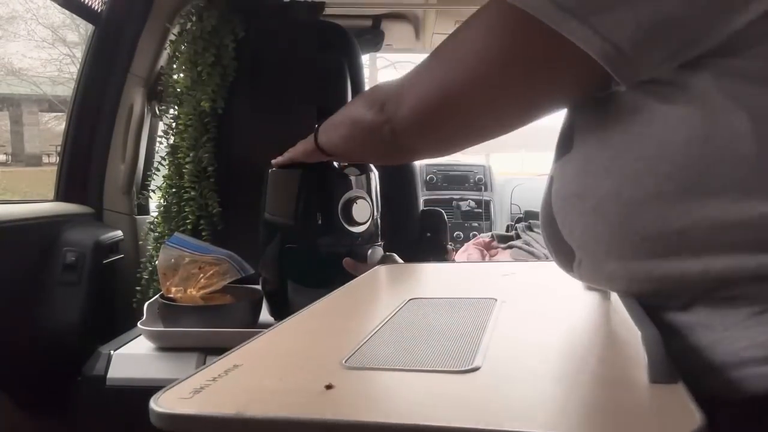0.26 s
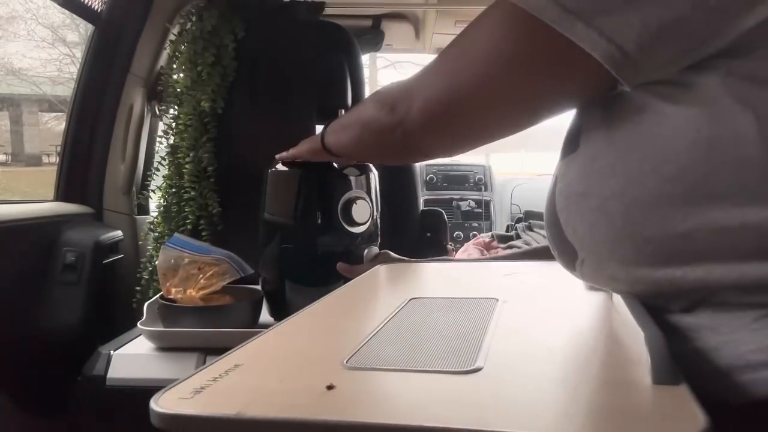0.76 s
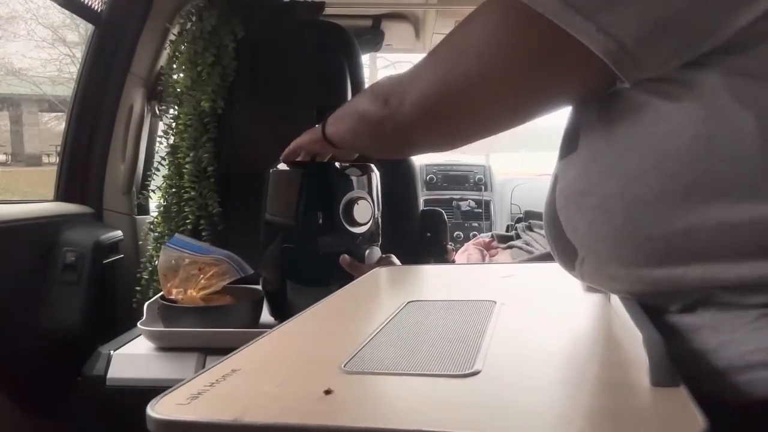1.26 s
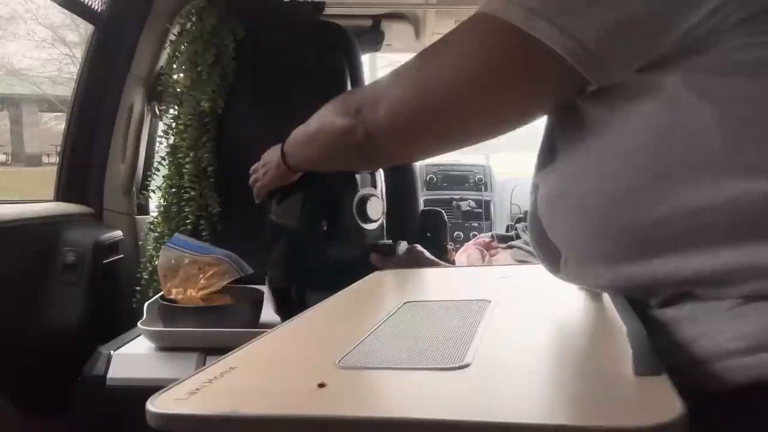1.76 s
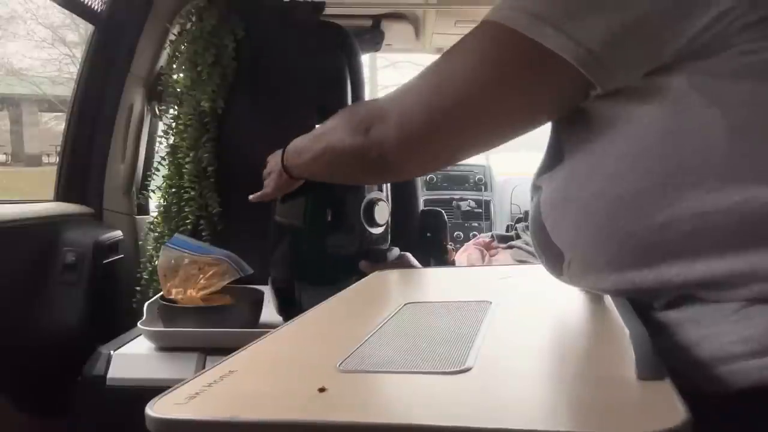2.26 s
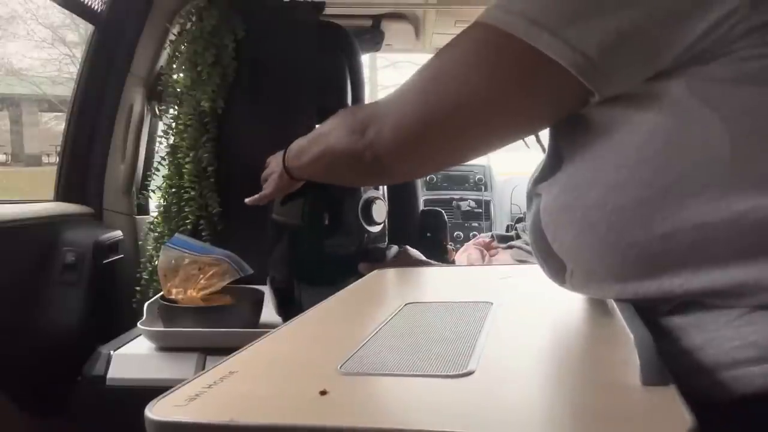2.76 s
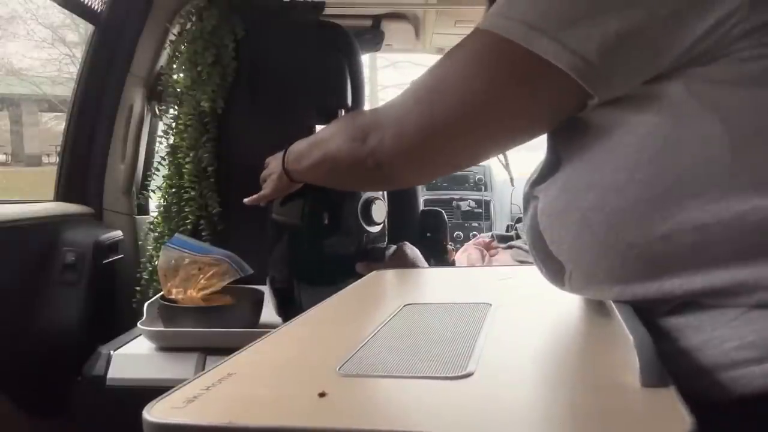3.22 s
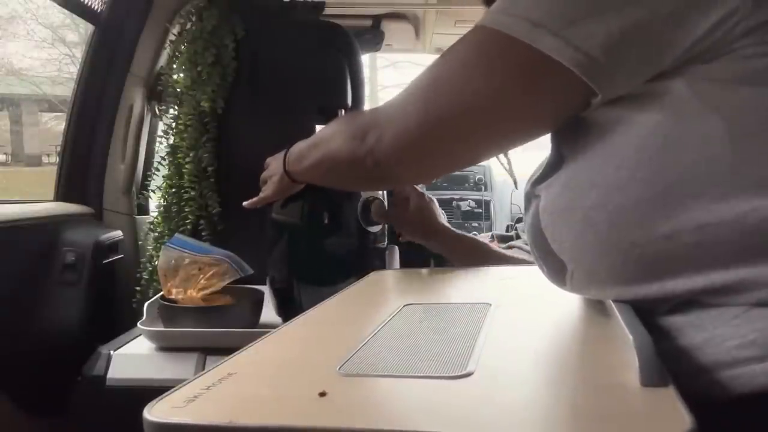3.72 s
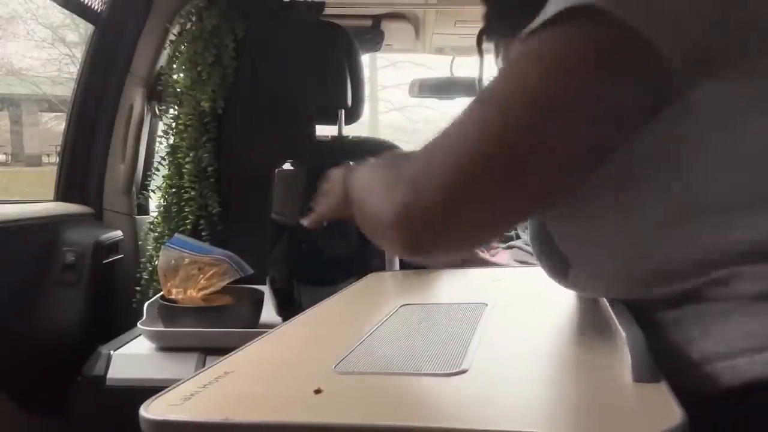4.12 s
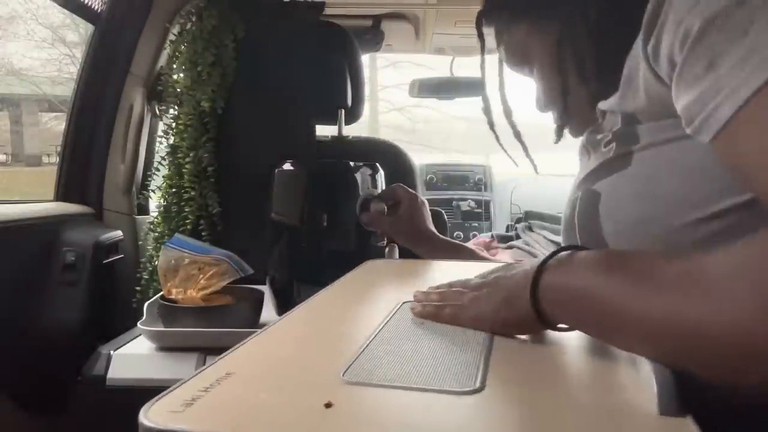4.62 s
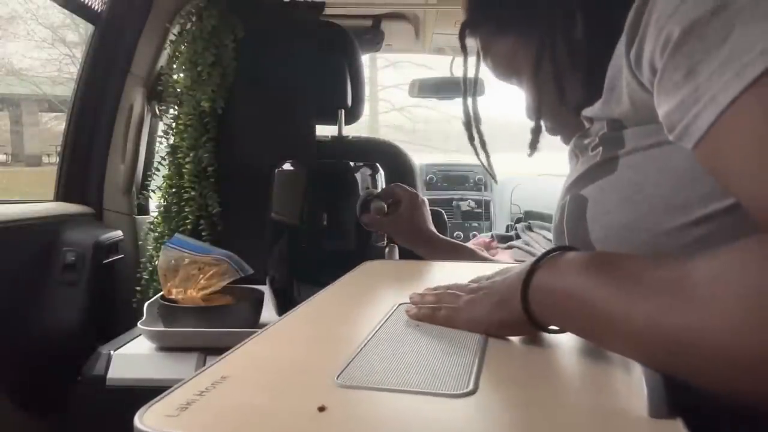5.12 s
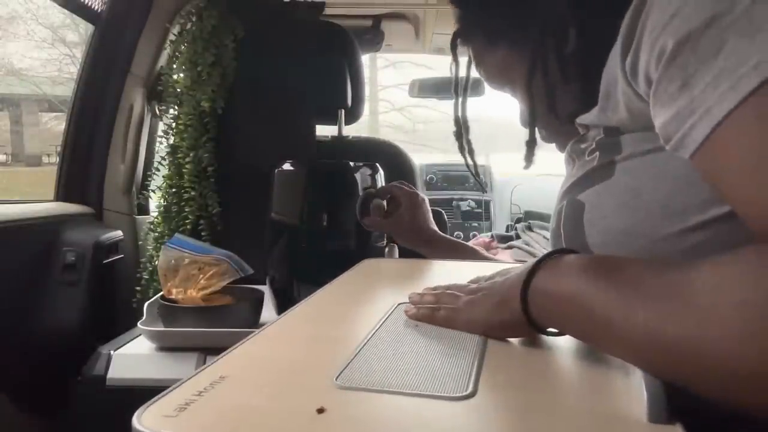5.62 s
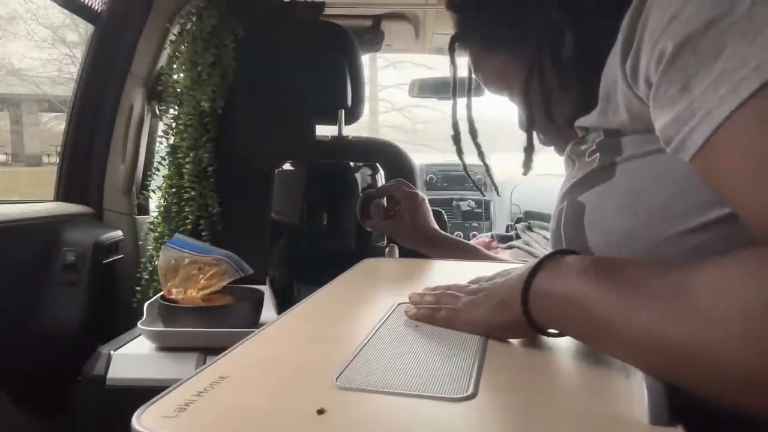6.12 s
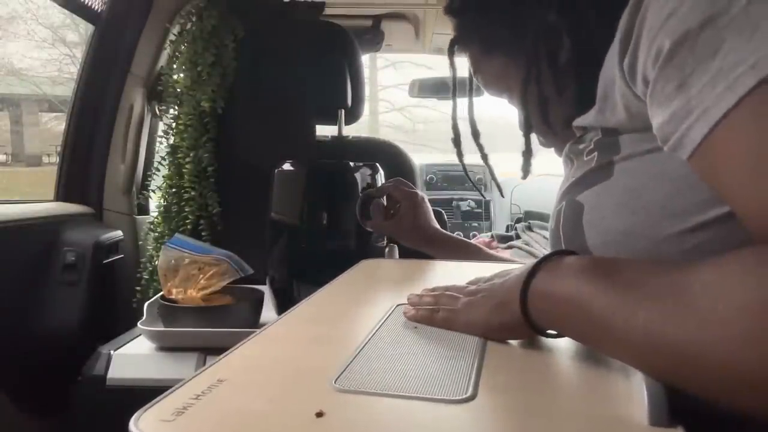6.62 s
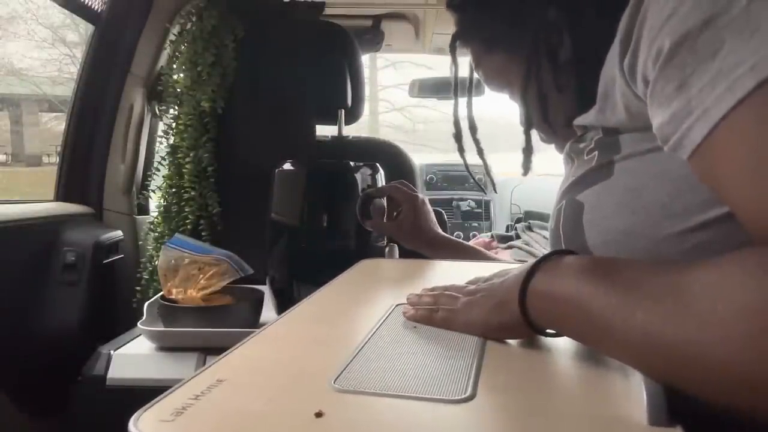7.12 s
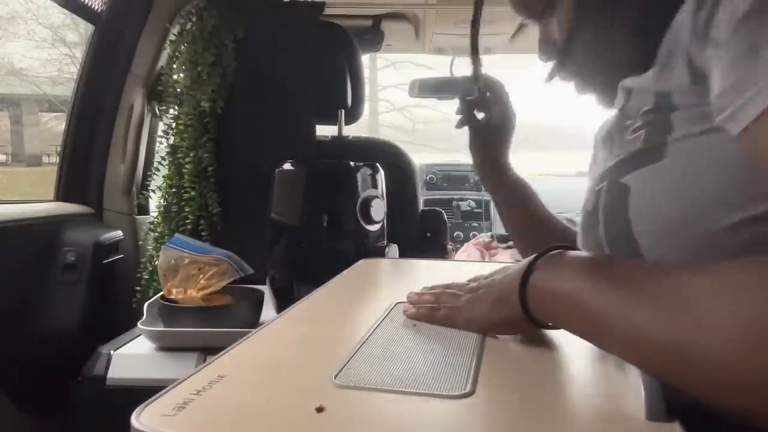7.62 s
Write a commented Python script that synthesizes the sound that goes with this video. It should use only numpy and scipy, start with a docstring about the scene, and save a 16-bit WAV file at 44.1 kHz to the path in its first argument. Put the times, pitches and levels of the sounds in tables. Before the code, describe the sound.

Steady mechanical ticking, hollow plastic knocks and hand rubs, then a hard clunk starts a fan whoosh; dial clicks follow and the ticking quickens.

```python
"""Over the low rumble of a parked van, an air fryer's clockwork timer ticks about four times a second throughout.
From the start a hand rubs and squeaks on the plastic shell, clothing swishes, and the fryer is knocked three times.
At the last knock its fan spins up into a rush of air; later, fingers turn the timer dial: it clicks and ticks faster.
Knocks and ticks are short noise bursts and dying tones; rubbing, air and rumble are noise shaped in pitch and time."""
import sys
import numpy as np
from scipy import signal
from scipy.fft import rfft, irfft
from scipy.io import wavfile
from scipy.ndimage import uniform_filter1d

SR = 44100
rng = np.random.default_rng(int(sys.argv[2]) if len(sys.argv) > 2 else 0)


def dump(signal):
    """Clip the signal to [-1, 1] and save it as 16-bit WAV at the path in sys.argv[1]."""
    limited = np.clip(np.atleast_2d(signal).T, -1, 1)
    pcm = np.round(limited * 32767).astype(np.int16)
    wavfile.write(sys.argv[1], SR, pcm)


N = 347022
FREQS = np.fft.rfftfreq(N, 1 / SR)
TIME = np.arange(N) / SR
RING_TIME = np.arange(SR * 3 // 4) / SR

# ringing tones of the plastic shell: [f/Hz, level/dB, time to fall by 60 dB/s]
SHELL_MODES = [(382, -8, 0.06), (476, -1.5, 0.069), (552.8, 5, 0.07), (685, 6.5, 0.037), (755, 1, 0.04),
               (843, -6.5, 0.091), (907, -10.5, 0.06), (1080, -1.5, 0.042), (1209, -7.5, 0.11),
               (1410, -10, 0.055), (1540, -11.5, 0.04)]
# sound colour of a hard contact: [f/Hz, level/dB]
CRACK_COLOUR = [(200, 0), (700, -0.5), (1700, 3.5), (3200, 2), (4400, -3.5), (6200, -14.5), (8000, -21),
                (11000, -14), (16000, -24)]
# sound colour of loose parts clattering: [f/Hz, level/dB]
CLATTER_COLOUR = [(30, -22.5), (100, -8.5), (330, -8), (700, -5), (1100, -16), (1800, -20.5), (4000, -30.5),
                  (9000, -49.5)]
# sound colour of a timer tick: [f/Hz, level/dB]
TICK_COLOUR = [(1400, -12.5), (2200, -10), (3900, -14), (5000, 0), (6000, -0.5), (8800, -0.5), (9900, -9.5),
               (10800, 1.5), (15000, -1.5), (16500, -13)]
SHELL_RISE_S = 0.001  # how fast the shell takes up a blow


def amp(db):
    """Turns decibels into a gain."""
    return 10 ** (np.asarray(db) / 20)


def unit(x):
    """Scales a signal to an average strength (rms) of 1."""
    return x / np.sqrt(np.mean(x ** 2) + 1e-20)


def at_hz(points, hz):
    """Reads a spectrum between its points, on a log-frequency axis."""
    f, value = np.transpose(points)
    return np.interp(np.log(hz + 1), np.log(f + 1), value)


def at_time(points, t):
    """Reads a curve in time between its points."""
    return np.interp(t, *np.transpose(points))


def add(mix, s, sound):
    """Mixes a sound in at time s, cutting off what runs past the end."""
    start = max(round(s * SR), 0)
    part = mix[:, start:][:, :sound.shape[-1]]
    part += sound[..., :part.shape[1]]


def wander(rate_hz):
    """Slow random movement of rms 1: noise with its fast changes filtered away."""
    spectrum = rfft(rng.standard_normal(N))
    return unit(irfft(spectrum * np.exp(-(FREQS / rate_hz) ** 2), N))


def tint(x, spectrum):
    """Filters a signal to give it a sound colour, at rms 1."""
    size = x.shape[-1]
    gain = amp(at_hz(spectrum, np.fft.rfftfreq(size, 1 / SR)))
    return unit(irfft(rfft(x) * gain, size))


def burst(spectrum, t60, rise, tail_db, tail_t60):
    """Dense resonances and close reflections of one contact: fading noise with a weak longer tail."""
    t = RING_TIME[:SR // 3]
    fade = amp(-60 * t / t60)
    tail = amp(tail_db - 60 * t / tail_t60)
    envelope = (fade + tail) * (1 - np.exp(-t / rise))
    return tint(rng.standard_normal((2, len(t))), spectrum) * envelope


def ring(modes, rise, scatter):
    """Dying tones start from rest, their reflections at any phase; each blow weights them a little differently."""
    hz, db, t60 = np.transpose(modes)[:, :, None]
    t = RING_TIME[:int(min(t60.max(), .7) * SR)]
    weight = 1 + scatter * rng.standard_normal((2, len(hz), 1))
    is_reflection = np.arange(2)[:, None, None]  # row 0 is direct, row 1 reflected
    phase = 2 * np.pi * rng.random((2, len(hz), 1)) * is_reflection
    waves = weight * amp(db - 60 * t / t60) * np.sin(2 * np.pi * hz * t + phase)
    level = np.sqrt(2) / np.linalg.norm(amp(db))
    return waves.sum(1) * level * (1 - np.exp(-t / rise))


def reflect(x, strength):
    """Close surfaces return the sound within a few milliseconds and comb its spectrum."""
    # reflections from the table, windows and seats: [delay/s, gain]
    echoes = [(.0019, 0.99), (.0043, 0.08), (.0066, 0.33), (0.0136, -.2), (0.0191, 0.14)]
    out = x.copy()
    for delay, gain in echoes:
        add(out, delay, strength * gain * x)
    return out / np.sqrt(1 + sum((strength * gain) ** 2 for _, gain in echoes))


def ports(pair, lead, width_db):
    """Two microphone ports: direct sound leads in phase at one (lead > 0: left), reflections differ between them."""
    # stereo width: [f/Hz, side minus mid level/dB]
    width = [(100, -16), (220, -7.5), (380, 2.5), (700, -2), (1300, -4), (2400, 2), (4400, 1), (8000, 11.5),
             (12000, -7), (16000, -24.5)]
    direct, diffuse = rfft(pair)
    lead = np.clip(lead, -1, 1)
    difference = 1j * lead * direct + np.sqrt(1 - lead ** 2) * diffuse  # 1j is a quarter-cycle shift
    side = amp(at_hz(width, FREQS) + width_db) * difference
    return irfft(np.array([direct + side, direct - side]), N)


def cabin():
    """Uneven low rumble of the parked van with a faint hiss: shaped noise whose level sways."""
    # sound colour of the rumble: [f/Hz, level per Hz/dB]
    rumble_colour = [(20, -21), (42, 6), (75, 7), (140, 0.5), (260, -12.5), (600, -23), (1300, -32.5),
                     (2500, -40.5), (8000, -52), (14500, -45.5), (16000, -53.5)]
    rumble = tint(rng.standard_normal((2, N)), rumble_colour)
    sway = amp(0.82 * wander(5.8))
    return ports(amp(-56.0) * rumble * sway, lead=0, width_db=-1.0)


def strokes(rows, rise, t60):
    """Level of a series of sliding movements: each gathers speed, holds and dies away."""
    power = np.zeros(N)
    for s, length, db in rows:
        t = TIME - s
        attack = np.clip(t / rise, 0, 1)
        fade = amp(db - 60 * np.maximum(t - length, 0) / t60)
        power += (attack * fade) ** 2
    return np.sqrt(power)


def friction(spectrum, level, grain_db, grain_hz):
    """Sliding contact: hiss broken into small catches."""
    grain = amp(grain_db * wander(grain_hz))
    return tint(rng.standard_normal((2, N)) * grain, spectrum) * level


def struck_at(spot_hz):
    """Shell tones as one spot excites them: those near its favoured frequency ring louder."""
    lift_db, reach_octaves = 8.5, 0.19
    modes = []
    for hz, db, t60 in SHELL_MODES:
        octaves_away = np.log2(hz / spot_hz)
        lift = lift_db * np.exp(-(octaves_away / reach_octaves) ** 2)
        modes.append((hz, db + lift, t60))
    return modes


def catches():
    """A fingertip snags and lets go, flicking a different spot of the shell each time."""
    # snags as the hand shifts its grip: [t/s, level/dB]
    snags = [(.566, -51.5), (.584, -52), (.666, -48.5), (.708, -58), (1.066, -59), (1.092, -59),
             (1.318, -59), (1.347, -58), (1.472, -70), (1.755, -54.5), (1.79, -49), (1.967, -52.5),
             (2.011, -55), (2.558, -64), (2.888, -53.5), (2.926, -50.5)]
    out = np.zeros((2, N))
    for s, db in snags:
        spot_hz = rng.uniform(550, 1200)
        add(out, s, amp(db) * ring(struck_at(spot_hz), rise=SHELL_RISE_S, scatter=0.51))
        flick = burst(CRACK_COLOUR, t60=0.035, rise=0.0012, tail_db=-13, tail_t60=0.17)
        add(out, s, amp(db - 11.5) * flick)
    return out


def handling():
    """Skin catches on the plastic in separate slips that ring the shell; cloth slides on cloth."""
    # strokes of the hand on the shell: [t/s, length/s, relative level/dB]
    rubs = [(0, 0.057, -55), (.5, 0.1, -57), (.66, 0.065, -62.5), (1.0, 0.069, -60), (1.23, 0.26, -63.5),
            (1.55, 0.46, -53.5), (1.85, 0.071, -43.5), (2.2, 0.03, -44.5), (2.5, 0.074, -56),
            (2.87, 0.068, -51), (3.05, 0.027, -57), (3.23, 0.086, -54)]
    # swishes of clothing as the arm moves: [t/s, length/s, level/dB]
    swishes = [(.52, 0.19, -71.5), (1.29, 0.65, -72.5), (3.26, 0.069, -76), (3.87, 0.58, -67),
               (4.35, 0.07, -56.5), (7.41, 0.4, -69.5)]
    # sound colour of the rubbing hand: [f/Hz, level/dB]
    rubbing_colour = [(150, -3), (400, 1.5), (650, -3.5), (1150, -12), (4000, -18.5), (7500, -37),
                      (15000, -26.5)]
    # sound colour of the clothing: [f/Hz, level/dB]
    cloth_colour = [(500, -14), (1500, 5.5), (4500, 2), (8000, -7), (11000, -4), (13500, 3.5)]
    slips_per_s = 380  # on average
    rub = strokes(rubs, rise=0.014, t60=0.14)
    hand = reflect(friction(rubbing_colour, rub, grain_db=3.5, grain_hz=70), strength=0.17)
    slip_now = rng.random(N) < slips_per_s / SR
    slips = slip_now * rng.standard_normal((2, N)) * amp(2.5 * wander(25))
    shell = signal.oaconvolve(slips, ring(SHELL_MODES, rise=.001, scatter=.1), axes=1)[:, :N]
    shell = tint(shell, [(400, -9), (700, 0), (2000, 2)])  # (f/Hz, level/dB)
    swish = strokes(swishes, rise=0.017, t60=0.45)
    cloth = friction(cloth_colour, swish, grain_db=2.0, grain_hz=152)
    mix = amp(-12) * hand + amp(-6) * shell * rub + catches() + cloth
    return ports(mix, lead=-0.46, width_db=-3.5)


def squeaks():
    """A fingertip sticks and slips in a short run of cycles, heard as a tone with unsteady pitch."""
    # fingertips squeaking on the plastic: [t/s, f/Hz, relative level/dB, length/s]
    squeak_list = [(1.399, 1810, -46, 0.0089), (1.926, 875, -39, 0.02), (2.696, 758, -51.5, 0.012),
                   (2.907, 715, -56.5, 0.053), (3.066, 798, -59.5, 0.021)]
    out = np.zeros((2, N))
    for s, hz, db, length in squeak_list:
        size = int(length * SR)
        jitter = unit(uniform_filter1d(rng.standard_normal(size), 90))
        turns = np.cumsum(hz * (1 + 0.11 * jitter)) / SR
        add(out, s, amp(db + 1.5) * np.hanning(size) * np.sin(2 * np.pi * turns))
    return reflect(out, strength=0.39)


def fan_speed(t):
    """Share of full speed: the motor pulls steadily against air drag that grows with speed squared."""
    switch_on_s, run_up_s = 2.25, 1.155
    return np.tanh(np.maximum(t - switch_on_s, 0) / run_up_s)


def fan():
    """Turbulent air grows with fan speed, the treble fastest, and is coloured by the duct."""
    # air through the fryer at full speed, before the duct: [f/Hz, level per Hz/dB]
    air_colour = [(25, -22.5), (50, 0), (110, 1), (330, 1), (390, -11), (460, -3.5), (700, -12.5),
                  (1100, -14.5), (1850, -21), (3200, -30.5), (5000, -34.5), (7500, -53.5), (15000, -108)]
    # resonances of the duct: [f/Hz, width/Hz, lift/dB]
    duct = [(224.2, 23, 6.5), (1060, 43, 2.5), (1567, 70, 5), (1754, 81, -9), (2270, 225, 5.5),
            (3140, 190, 8.5)]
    noise = rng.standard_normal((2, N))
    hz, t, air = signal.stft(noise, SR, nperseg=4096, noverlap=3072)
    lift_db = sum(db / (1 + (2 * (hz - f) / width) ** 2) for f, width, db in duct)
    colour = unit(amp(at_hz(air_colour, hz) + lift_db))[:, None]
    speed_powers = [(100, 1.3), (300, 1.6), (1000, 3.2), (3000, 6.1)]  # (f/Hz, power of speed)
    gain = colour * fan_speed(t) ** at_hz(speed_powers, hz)[:, None]
    air = signal.istft(air * gain, nperseg=4096, noverlap=3072)[1][:, :N]
    flutter_db = .5 * wander(22)
    return ports(air * amp(-49.5 + flutter_db), lead=0.38, width_db=-2.0)


def fan_tones():
    """Shaft and blades sing thin tones that only carry near full speed."""
    # fan tones: [multiple of the shaft speed, relative level/dB]
    orders = [(2, -59), (9, -62)]
    blade_hz = 501.5 * fan_speed(TIME)  # rate of passing blades
    shaft_hz = blade_hz / 9  # nine blades
    turns = np.cumsum(shaft_hz * (1 + .001 * wander(7))) / SR
    tones = 0
    for order, db in orders:
        tones = tones + amp(db + 1.3 * wander(4)) * np.sin(2 * np.pi * order * turns)
    fade_in = np.clip((blade_hz - 415) / 18, 0, 1)
    return np.sqrt(2) * tones * fade_in * amp([[-.7], [.7]])  # slightly louder on the right


def beats():
    """Ticks as (s, drive 0-1, pallet 0 or 1): steady when left alone, faster, harder and uneven under torque."""
    # torque of the fingers on the timer dial: [t/s, share 0-1]
    torque_curve = [(4.434, 0), (5.537, .811), (6.283, 1), (6.888, .318), (7.159, .161)]
    beat_s, limp_s = .26598, .00094  # free beat; limp lengthens one beat and shortens the next
    hurry_s, skew_s = .039, .015  # full torque shortens the beat and throws it out of step
    full_drive = 0.55  # share of torque at which a tick gets no louder
    s, tock = .2315, 0  # first tick
    while s < N / SR:
        torque = at_time(torque_curve, s)
        yield s, min(torque / full_drive, 1), tock
        limp = limp_s - skew_s * torque ** 4
        s += beat_s - hurry_s * torque + (-limp if tock else limp)
        tock = 1 - tock


def snap(click, db, ring_db, drive):
    """One snap of steel in the timer: its click, then a few uneven bounces that ring the small parts, higher under load."""
    # ringing tones of the small parts: [f/Hz, level/dB, time to fall by 60 dB/s]
    clockwork = [(1416, -3, 0.031), (2983, -10, 0.04), (4988, 2.5, 0.044), (5100, -1.5, 0.028),
                 (7300, -8, 0.022), (12730, -8.5, 0.015)]
    gap_s, loss_db = .0026, -6.5  # typical gap between bounces, change at each bounce
    load_sharpens, seating = .03, .007  # shares of pitch: rise under full drive, random shift per bounce
    out = np.zeros((2, len(RING_TIME)))
    add(out, 0, amp(db) * click)
    s = 0
    for bounce in range(3):
        hit_db = db + loss_db * bounce + rng.uniform(-1.974, 2.8)
        tuning = 1 + load_sharpens * drive + seating * rng.standard_normal(len(clockwork))
        modes = [(hz * shift, level, t60) for (hz, level, t60), shift in zip(clockwork, tuning)]
        contact = burst(TICK_COLOUR, t60=.008, rise=.0002, tail_db=-26, tail_t60=.14)
        add(out, s, amp(hit_db + 4) * contact)
        add(out, s, amp(hit_db + ring_db) * ring(modes, rise=.0004, scatter=.25))
        s += gap_s * rng.uniform(0.44, 1.5)
    return out


def timer():
    """The escapement clicks faintly as it lets go, then ticks; the dial adds ratchet clicks that knock on the front panel."""
    # fingers and dial ratchet: [t/s, metal snap relative level/dB, plastic knock level/dB, panel level/dB]
    dial = [(0.542, -60.5, -54, -51), (1.736, -63, -73, -53), (4.022, -80, -51.5, -53),
            (4.411, -44.5, -52.5, -62), (4.417, -47.5, -52, -65), (4.439, -53, -44.5, -61),
            (4.487, -51, -61, -57), (4.5745, -50.5, -41.5, -33), (4.663, -53, -41, -41),
            (5.793, -55, -44, -69), (5.864, -48, -45, -57), (7.194, -82, -51.5, -52)]
    # sound colour of the dial's knob and housing: [f/Hz, level/dB]
    knob_colour = [(300, -15.5), (650, 5), (950, -2.5), (1400, -2), (2300, -4.5), (4200, -9), (6000, -29),
                   (15000, -39.5)]
    # sound colour of the ratchet's pawl snapping: [f/Hz, level/dB]
    pawl_colour = [(1500, -54), (4500, 7.5), (9000, -3), (13000, 3), (15000, 3.5), (16500, -14)]
    # ringing tones of the front panel: [f/Hz, level/dB, time to fall by 60 dB/s]
    panel = [(606, 6.5, 0.067), (787, 9.5, 0.053), (926, 15, 0.028), (1227, 1.5, 0.053)]
    release_s = (.021, .012)  # typical time from letting go to the tick, for each pallet
    out = np.zeros((2, N))
    click = burst(TICK_COLOUR, t60=.028, rise=.0004, tail_db=-32, tail_t60=.08)
    for s, drive, tock in beats():  # the two pallets alternate; the second hits the case harder
        db = -45 + 7 * drive + rng.uniform(-1.6, 1.6)  # no two teeth are alike
        force_db = .5 * (db + 47.5) + 3 * tock  # a harder tick rings the works and the case more
        release_at = s - release_s[tock] * rng.uniform(.8, 1.4)
        release_db = db - 29 + rng.uniform(-2.3, 2.2)
        add(out, release_at, snap(click, release_db, ring_db=0, drive=drive))
        add(out, s, snap(click, db - 13.5, ring_db=-3.5 + 1.26 * force_db, drive=drive))
        case = burst(knob_colour, t60=.06, rise=.0005, tail_db=-28, tail_t60=.12)
        add(out, s, amp(db - 16.5 + force_db) * case)
    for s, metal_db, plastic_db, panel_db in dial:
        metal = burst(pawl_colour, t60=0.023, rise=0.00041, tail_db=-19.5, tail_t60=0.13)
        plastic = burst(knob_colour, t60=0.049, rise=.0006, tail_db=-20.0, tail_t60=0.3)
        add(out, s, amp(metal_db + 5.0) * metal)
        add(out, s, amp(plastic_db) * plastic)
        add(out, s + .002, amp(panel_db) * ring(panel, rise=.002, scatter=.1))
    return ports(reflect(out, strength=.3), lead=0.29, width_db=-2.0)


def lead_in(grow_t60):
    """Parts scrape and take up their slack in the moments before they strike: fading noise played backwards."""
    t = RING_TIME[:SR // 12]
    noise = tint(rng.standard_normal((2, len(t))), CLATTER_COLOUR)
    return (noise * amp(-60 * t / grow_t60))[:, ::-1]


def rattle(t60, mode_t60):
    """The loose basket keeps jittering against its housing, which excites and damps its tones at once."""
    # ringing tones of the metal basket: [f/Hz, level/dB]
    basket = [(1104, 0), (1260, -5), (1502, -1), (2470, -15), (4113, -20), (10930, -18)]
    t = RING_TIME[:SR // 2]
    modes = ring([(hz, db, mode_t60) for hz, db in basket], rise=.001, scatter=0)
    jitter = rng.standard_normal((2, len(t)))
    buzz = signal.fftconvolve(jitter, modes, axes=1)[:, :len(t)]
    return unit(buzz) * amp(-60 * t / t60)


def knocks():
    """Each knock cracks, rings the shell and the basket inside it, and shakes the whole fryer; heavy ones thud on the support."""
    # blows: [t/s, shell relative level/dB, crack relative level/dB, body thump level/dB, spot's favoured f/Hz]
    blows = [(0.2879, -23.5, -43, -25.5, 757), (0.304, -42, -26.5, -53, 1220), (0.33, -23, -37, -40, 600),
             (0.341, -45, -68, -31, 560), (0.972, -53.5, -90, -50, 750), (1.227, -55, -51.5, -51.5, 1080),
             (1.398, -50, -58, -49.5, 1390), (1.523, -51.5, -73, -38.5, 408),
             (1.601, -36.5, -36, -48, 1120), (1.632, -26, -27, -41, 820), (1.653, -24.5, -41.5, -27.5, 546),
             (1.859, -48, -52, -44.5, 1110), (1.884, -45, -52.5, -42.5, 640),
             (2.048, -70.5, -56.5, -51, 910), (2.065, -61, -68, -48.5, 400), (2.2327, -17, -19, -42, 1450),
             (2.24, -13, -29, -29, 1050), (2.244, -9.5, -41, -21, 754)]
    # ringing tones of the fryer's whole body: [f/Hz, level/dB, time to fall by 60 dB/s]
    body = [(111, 1, 0.07), (152, 2.5, 0.15), (227.6, 5.5, 0.12), (255.4, 0, 0.15)]
    # stiff ribs and corners of the shell: [f/Hz, level/dB, time to fall by 60 dB/s]
    ribs = [(1858, -0.5, 0.064), (2230, 4.5, 0.035), (2494, 2, .045), (3290, 0, 0.032), (3610, 2, 0.02),
            (4000, -2.5, 0.055)]
    # the fryer's weight drops on its support and rocks back: [t/s, level/dB]
    landings = [(0.292, -36), (.339, -29), (2.244, -19), (2.335, -42), (2.399, -42.5)]
    # ringing tones of the support: [f/Hz, level/dB, time to fall by 60 dB/s]
    support = [(76.7, 2.5, .14), (97, 3.5, 0.1)]
    # basket clinking against its housing at the hard knocks: [t/s, level/dB]
    clinks = [(0.3035, -54), (1.63, -18), (2.2324, -23)]
    # sound colour of the clinks: [f/Hz, level/dB]
    steel_colour = [(2500, -4), (5300, -5), (7300, -10.5), (10200, -3), (13000, -6.5), (15500, -19.5)]
    out = np.zeros((2, N))
    for s, shell_db, crack_db, thump_db, spot_hz in blows:
        scrape = lead_in(grow_t60=0.07)
        add(out, s - scrape.shape[1] / SR, amp(shell_db - 14) * scrape)
        shell = ring(struck_at(spot_hz), rise=SHELL_RISE_S, scatter=0.24)
        add(out, s, amp(shell_db + 1.5) * shell)
        clatter = burst(CLATTER_COLOUR, t60=.05, rise=.0013, tail_db=-33, tail_t60=.45)
        add(out, s, amp(shell_db - 8) * clatter)
        add(out, s, amp(shell_db - 40) * rattle(t60=.46, mode_t60=.03))
        crack = burst(CRACK_COLOUR, t60=0.05, rise=0.0015, tail_db=-22.0, tail_t60=0.22)
        add(out, s, amp(crack_db - 1.0) * reflect(crack, strength=1.0))
        add(out, s, amp(crack_db - 5) * ring(ribs, rise=.0008, scatter=.25))
        add(out, s, amp(thump_db) * ring(body, rise=0.0018, scatter=0.32))
    for s, db in landings:
        add(out, s, amp(db) * ring(support, rise=0.0054, scatter=.05))
    for s, db in clinks:
        clink = burst(steel_colour, t60=0.032, rise=0.0016, tail_db=-30.0, tail_t60=0.22)
        add(out, s, amp(db) * reflect(clink, strength=0.23))
    return ports(out, lead=-0.59, width_db=-2.5) * amp([[-.5], [.5]])  # slightly louder on the right


def scene():
    """All sources at the two microphone ports."""
    background = cabin() + handling() + squeaks()
    return background + fan() + fan_tones() + timer() + knocks()


def record(dry):
    """The microphone's bass roll-off and the recorder's band limit."""
    bass_hz, edge_hz = 35, 16100
    dry = signal.sosfilt(signal.butter(4, bass_hz, "high", fs=SR, output="sos"), dry)
    band_limit = signal.firwin(255, edge_hz, window=("kaiser", 9), fs=SR)
    return signal.oaconvolve(dry, band_limit[None], "same")


dry = scene()
out = record(dry)
dump(out)
```